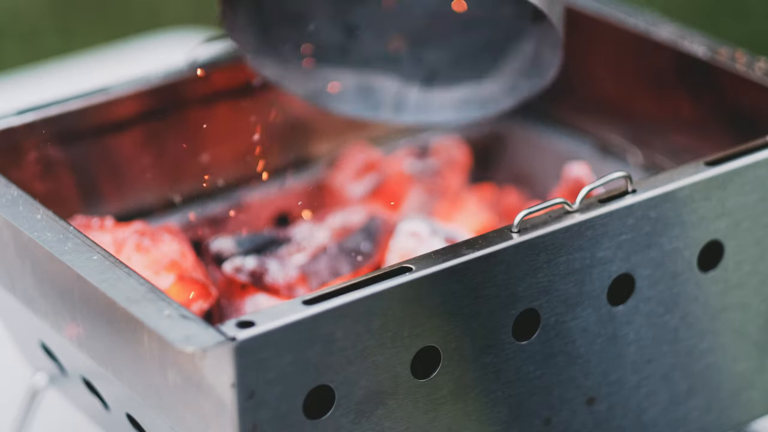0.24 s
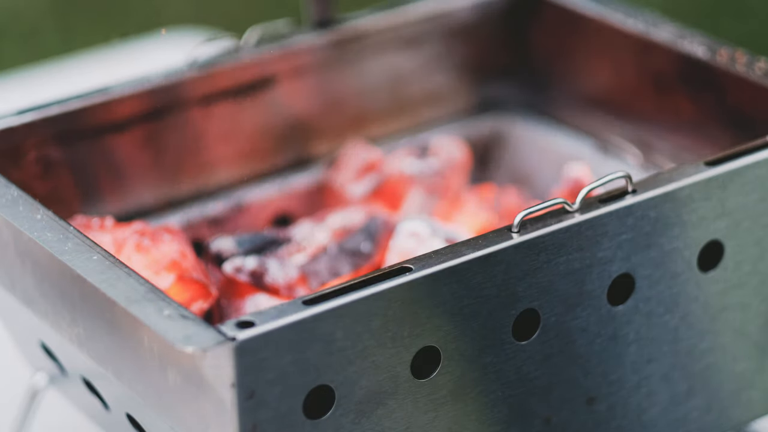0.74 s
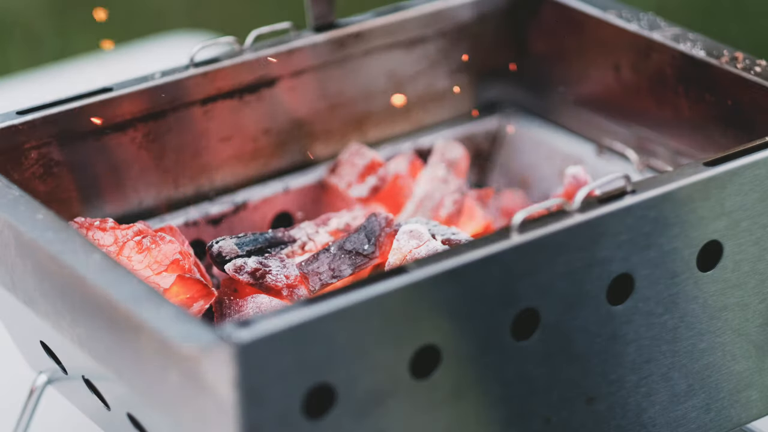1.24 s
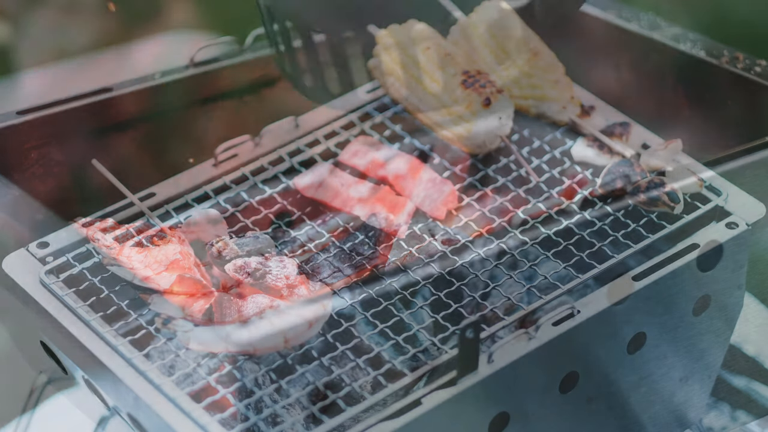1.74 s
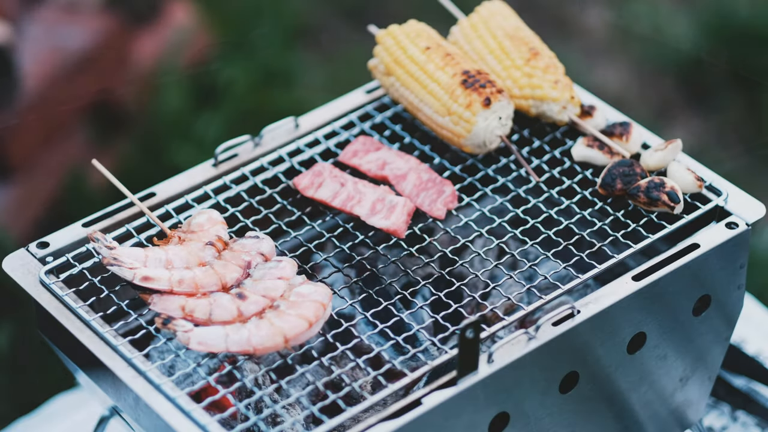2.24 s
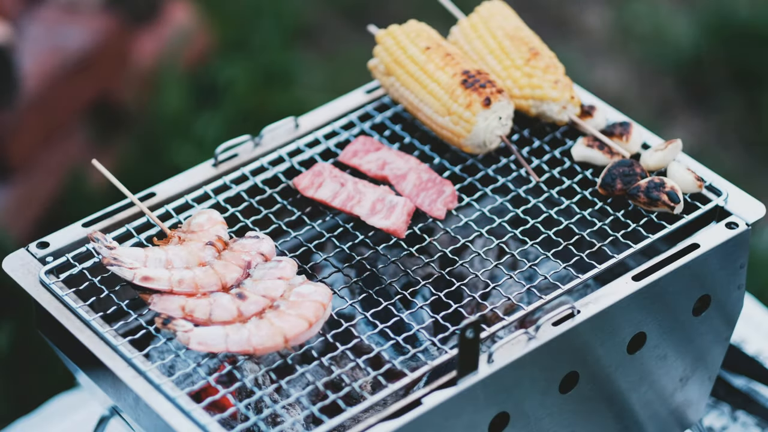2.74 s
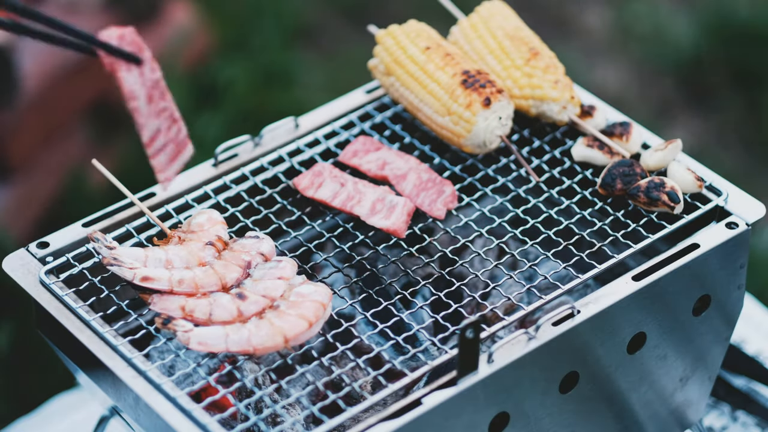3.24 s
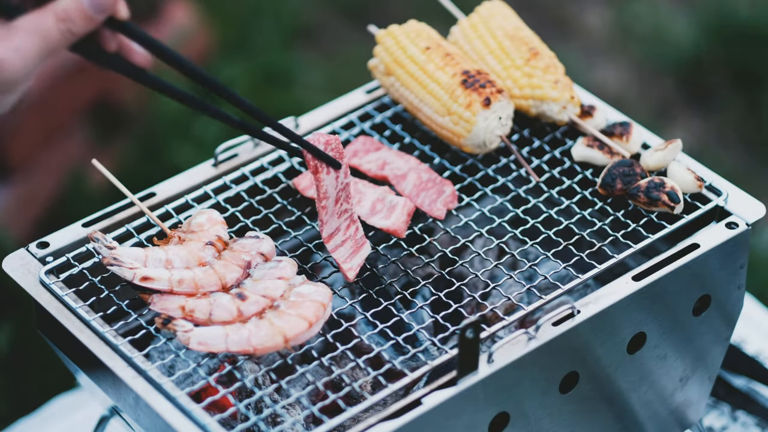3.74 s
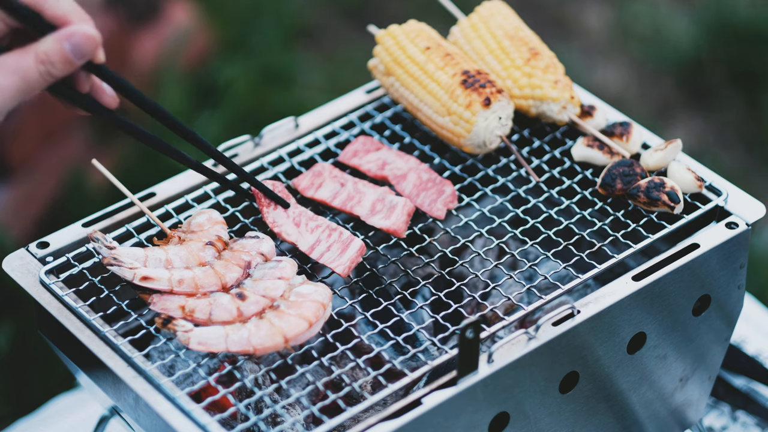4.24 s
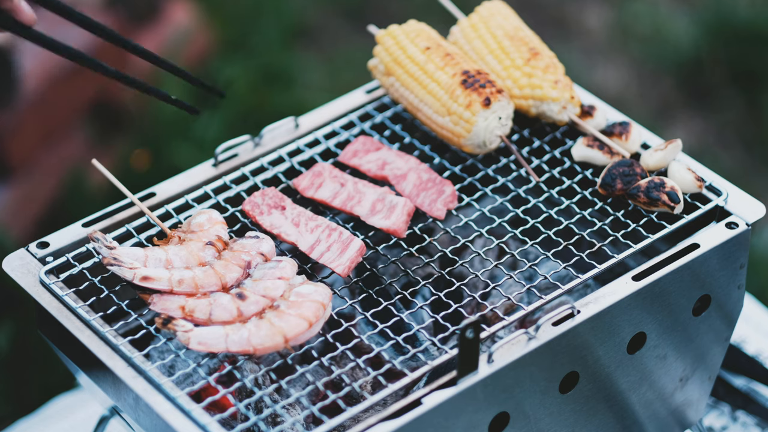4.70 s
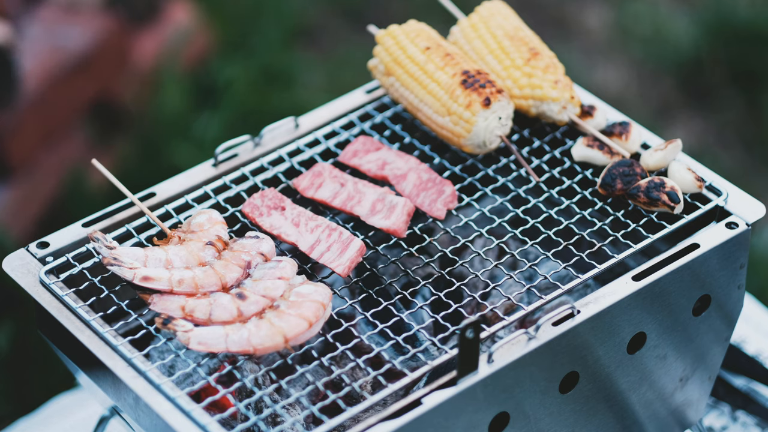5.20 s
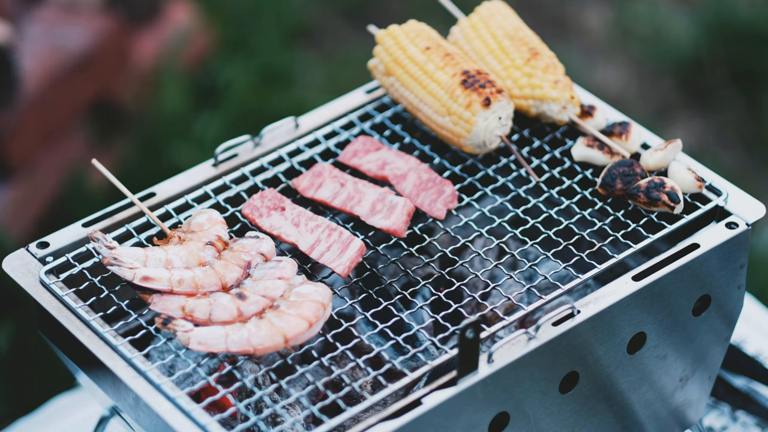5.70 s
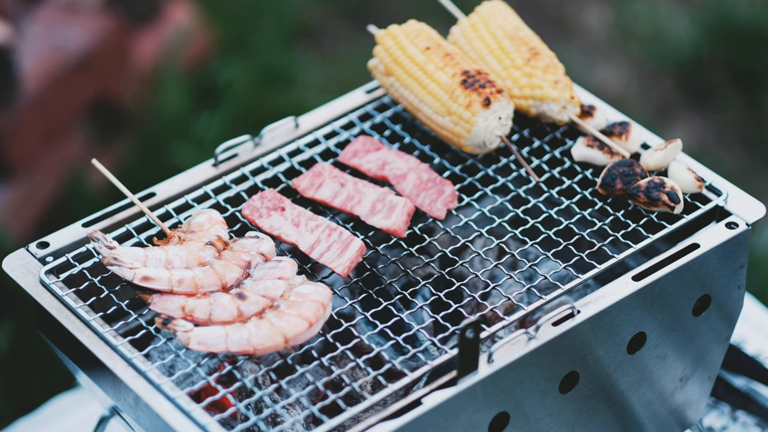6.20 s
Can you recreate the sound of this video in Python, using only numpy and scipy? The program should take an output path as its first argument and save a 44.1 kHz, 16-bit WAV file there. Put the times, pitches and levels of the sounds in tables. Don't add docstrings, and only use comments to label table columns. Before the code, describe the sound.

Close to the microphone in a quiet garden, hot coals tumble from a steel chimney into a metal grill with a bright rattle and gritty scrape. A heavy lump lands with a knock, then the rattle thins. Sharp isolated cracks follow over a soft hiss and a low rumbling draught. Fat sizzles later, while sparrows and songbirds call near and far.

```python
import sys
import numpy as np
from scipy import signal
from scipy.fft import rfft, irfft
from scipy.io import wavfile
from scipy.ndimage import uniform_filter1d

SR = 44100
rng = np.random.default_rng(int(sys.argv[2]) if len(sys.argv) > 2 else 0)


def bounce(signal):
    frames = np.transpose(np.atleast_2d(signal))
    limited = np.clip(frames, -1, 1)
    pcm = np.round(limited * 32767).astype(np.int16)
    wavfile.write(sys.argv[1], SR, pcm)


def natural_amplitude(level_db):
    exponent = np.asarray(level_db, float) / 20
    return 10 ** exponent


N = 284886
TOP_HZ = 15700


def level(x, db):
    return x * natural_amplitude(db) / np.sqrt(np.mean(x ** 2) + 1e-30)


def curve(table):
    s, *columns = np.transpose(table)
    return [np.interp(np.arange(N) / SR, s, c) for c in columns]


def band(x, lo_hz, hi_hz, order=2):
    edges = [lo_hz, min(hi_hz, .45 * SR)]
    return signal.sosfilt(signal.butter(order, edges, "band", fs=SR, output="sos"), x)


def colour(x, spectrum):
    hz, db = np.transpose(spectrum)
    f = np.fft.rfftfreq(len(x), 1 / SR) + 1
    gain = natural_amplitude(np.interp(np.log(f), np.log(hz), db))
    return irfft(rfft(x) * gain, len(x))


def add(out, s, x):
    i = max(int(s * SR), 0)
    out[i:i + len(x)] += x[:N - i]


def rings(modes, size):
    t = np.arange(size) / SR
    phase = 2 * np.pi * rng.random(len(modes))
    return sum(natural_amplitude(db) * np.sin(2 * np.pi * hz * t + p) * np.exp(-np.log(1000) * t / t60)
               for (hz, db, t60), p in zip(modes, phase))


def walk(rate):
    k = int(SR / rate)
    held = np.repeat(rng.standard_normal(N // k + 1), k)
    return 1.29 * uniform_filter1d(uniform_filter1d(held, k), k)[:N]


def clicks(rate, spread_db):
    chance = rng.random((3, N))
    struck = chance[0] < rate / SR
    return struck * np.sign(chance[1] - .5) * natural_amplitude(-spread_db * np.log(chance[2] + 1e-4))


def tone(out_len, table, wobble=0):
    s, hz, db = np.transpose(table)
    t = s[0] + np.arange(out_len) / SR
    ends = np.clip(np.minimum(t - s[0], s[-1] - t) / 0.00089, 0, 1)
    turns = np.cumsum(np.interp(t, s, hz) + wobble) / SR
    return np.sqrt(2) * ends * natural_amplitude(np.interp(t, s, db)) * np.sin(2 * np.pi * turns)


def sung(notes, shape):
    return [[(s + ds, hz * r, db + g) for ds, r, g in shape] for s, hz, db in notes]


def echoes(x, fade, db):
    t = np.arange(SR // 3) / SR
    scatter = level(rng.standard_normal(len(t)) * np.exp(-t / fade), db) / np.sqrt(len(t))
    return x + signal.fftconvolve(x, scatter)[:N]


def rattle():
    # t/s, peak level/dB, grit level/dB, fade/s
    clangs = [(0.019, -14.5, -12, 0.032), (0.0514, -24, 4, 0.01), (0.0772, -23.5, -20, 0.024),
              (0.0951, -25.5, -19, 0.044), (0.159, -24, -3, 0.013), (0.2042, -31.5, -12, 0.036),
              (0.2808, -34.5, -9, 0.022), (0.39, -30, -11, 0.031), (0.48, -41, 0, 0.014),
              (0.5813, -23.5, -2, 0.031), (0.6683, -34.5, -11, 0.045), (0.6994, -36, -4, 0.044),
              (0.7275, -26.5, -13, 0.049), (0.7818, -27.5, -17, 0.018), (0.805, -30.5, -16, 0.021),
              (1.078, -14.5, -11, 0.014), (1.0828, -34, -23, 0.01), (1.1857, -35.5, 19, 0.011),
              (1.3706, -33, -7, 0.073), (1.4344, -27, -30, 0.03), (1.6127, -39.5, -8, 0.14),
              (1.6751, -26.5, -3, 0.0077), (1.8007, -32, -27, 0.073), (2.9894, -42, 1, 0.025),
              (3.1353, -39.5, -7, 0.024), (1.078, -25, 17, 0.043), (3.15, -29, 24, 0.032)]
    # f/Hz, level/dB, t60/s
    steel_modes = [(1118, -7.5, 0.099), (1400, -1.5, 0.072), (1722, -3.5, 0.067), (2038, -10.5, 0.14),
                   (2450, -6, 0.09), (2950, 1.5, 0.019), (3260, -3, 0.043), (3700, 0, 0.047),
                   (4200, -6, 0.052), (4700, -2, 0.054), (5480, -8, 0.04), (8080, 0, 0.026)]
    out, t = np.zeros(N), np.arange(8192) / SR
    for (s, db, grit_db, fade), n in zip(clangs, rng.standard_normal((len(clangs), 3, 8192))):
        chatter = n[0] * natural_amplitude(7.3 * n[1]) * np.exp(-t / fade)
        steel = level(signal.fftconvolve(chatter, rings(steel_modes, size=4096))[:8192], -5.0)
        scrape = level(band(chatter, 710, 6000), -4.0)
        grit = level(band(n[2] * np.exp(-t / (0.51 * fade)), 6000, 9300, order=1), grit_db)
        clang = steel + scrape + grit
        add(out, s + 0.000988, clang * natural_amplitude(db) / np.abs(clang).max())
    return out


def pops():
    # t/s, peak level/dB, ring f/Hz, bass level/dB, treble level/dB
    lumps = [(0.2157, -14, 7960, -24.5, -2), (0.3499, -15.5, 4900, -25, -5), (0.389, -13, 8250, -29.5, -21),
             (0.9066, -1.5, 7900, -33, 4.5), (1.064, -25, 1460, -28, -24), (1.8538, -18, 3850, 21, -28),
             (2.3296, -6.5, 3700, -24, -11), (2.388, -13.5, 2750, -13.5, 0.5),
             (2.7442, -2, 2450, -37, -4.5), (2.8451, -13.5, 2360, -6, -45),
             (2.9756, 1.5, 12900, -30.5, -11), (3.1067, -14.5, 1400, -14, -36),
             (3.4707, 4.5, 7460, -22.5, -10), (3.925, -10, 2630, -30, -8), (3.932, -6, 4700, -30, -6),
             (4.2364, -1.5, 3700, -24, -0.5), (4.599, 3, 4500, -30, -4.5), (4.758, -9.5, 4800, -30, -12),
             (4.8036, -15.5, 4700, -25, -1), (4.8849, -16.5, 2700, -6, -40), (5.014, -12.5, 4360, -21, 3),
             (5.2134, -16, 4600, -13, -18), (5.4817, -12, 3700, -18.5, -2.5),
             (5.6015, 3, 3130, -27.5, -4.5)]
    # burst/ms, body level/dB, dull above f/Hz
    forms = [(.5, -4, 15000), (.5, 4, 15000), (.5, 2.5, 15100), (.5, -4, 15000), (.5, 0, 12000),
             (.5, 0, 7950), (.5, 5, 13100), (.5, 0, 13000), (.5, 2, 13000), (.5, 8, 3640),
             (.5, -0.5, 15700), (.5, -21, 5600), (.3, -2.5, 9200), (.5, -4, 12940), (.5, 5, 13000),
             (.5, -22, 13000), (.4, -7, 15000), (.5, 5.5, 15000), (.5, -13, 8030), (.5, 2, 8000),
             (.5, 6, 15000), (.5, -6, 8000), (.5, 2, 8960), (.55, -3.5, 12000)]
    # t/s, peak level/dB, ring f/Hz
    sparks = [(0.144, -38, 1400), (0.16, -32, 3100), (0.207, -28, 3800), (0.241, -22.5, 1450),
              (0.283, -31, 3070), (0.322, -30, 4690), (0.3681, -23, 4400), (0.629, -20.5, 5960),
              (0.7276, -36, 4340), (1.002, -35, 4420), (1.04, -24, 5500), (1.143, -27, 3700),
              (1.284, -29.5, 5470), (1.306, -29, 1890), (1.37, -33, 5550), (1.511, -32, 3750),
              (1.621, -35, 4400), (1.6744, -26.5, 2050), (1.7999, -29.5, 4070)]
    # t/s, peak level/dB, ring f/Hz
    ticks = [(2.036, -36, 5480), (2.0785, -34, 1630), (2.1166, -36, 8060), (2.272, -34, 8160),
             (2.5548, -30.5, 1570), (2.6276, -35.5, 1720), (2.7294, -29, 2860), (3.013, -24.5, 4800),
             (3.187, -27, 4180), (3.242, -26.5, 3280), (4.5128, -27, 4600), (5.058, -27, 5340),
             (5.4982, -24, 3160), (5.819, -27.5, 1970), (5.905, -33, 7100), (6.119, -31, 4500),
             (6.332, -29, 6600), (6.427, -31, 8300)]
    cracks = [(*row, *form) for row, form in zip(lumps, forms)]
    cracks += [(*row, -25.5, -2.5, 0.22, 0, TOP_HZ) for row in sparks]
    cracks += [(*row, -25.5, -5, 0.51, 0, TOP_HZ) for row in ticks]
    cracks = sorted(cracks)
    out, t = np.zeros(N), np.arange(1024) / SR
    noises = rng.standard_normal((len(cracks), 1024))
    for (s, db, hz, bass_db, treble_db, ms, body_db, dull_hz), n in zip(cracks, noises):
        burst = n * (np.exp(-t * 1e3 / max(ms, .1)) + natural_amplitude(-15.5) * np.exp(-t / 0.0033))
        burst[:2] = -1.35
        body = level(band(burst, 1190, 2830), body_db - 9.5) + level(band(burst, 2170, 6500, order=3), -2)
        ring = level(band(burst, hz / 1.266, hz * 1.125, order=1), 0)
        bass = level(band(burst, 196, 2850, order=1), bass_db + 21.0)
        treble = level(band(burst, 4900, 10520, order=3), treble_db + 8.0)
        pop = band(body + ring + bass + treble, 40, dull_hz)
        add(out, s + 0.001072, pop * natural_amplitude(db) / np.abs(pop).max())
    return out


def spits():
    # t/s, peak level/dB, centre f/Hz
    snaps = [(2.3882, -29, 13200), (2.7441, -1.5, 11600), (2.9758, -8, 13200), (3.1070, -27.5, 13000),
             (3.9246, -28, 12900), (3.9322, -18, 12600), (4.238, -5, 11800), (4.5987, -11, 14200),
             (4.7576, -16, 13000), (5.014, -21, 12900), (5.483, -27, 12900), (0.907, -12, 13100),
             (2.329, -11, 6550), (2.329, -22, 14500), (2.7445, -16, 4940), (4.5985, -7, 5400),
             (5.6018, -8, 2210), (3.471, -4, 7950)]
    # t/s, peak level/dB, centre f/Hz
    grains = [(.004, -32, 1290), (0.0204, -23, 2950), (.0215, -25, 11000), (.035, -26, 6550),
              (0.051, -20, 10700), (.0642, -28, 11000), (.0712, -25, 10500), (.0885, -29, 8500),
              (.105, -32, 11000), (0.1597, -30, 9000), (.2185, -25, 9000), (0.225, -37, 2500),
              (.616, -33, 9000), (.634, -35, 9000), (.674, -37, 8500), (.7015, -38, 8500),
              (0.728, -21, 8250)]
    # t/s, peak level/dB, centre f/Hz
    fat_spits = [(3.6885, -41, 9500), (3.723, -36, 9500), (3.7284, -45, 9500), (3.7767, -36, 9500),
                 (3.8024, -39, 9500), (3.8157, -31, 9500), (3.895, -39, 9500), (3.9804, -46, 9500),
                 (4.042, -33, 9500), (4.0764, -33, 9500), (4.197, -29, 9400), (4.9412, -34, 9500),
                 (5.5548, -38, 9500), (5.659, -31, 9500), (5.8636, -45, 9500), (5.9284, -35, 9500),
                 (6.0546, -33, 9500), (6.2696, -45, 9500), (6.3735, -30, 9500)]
    # t/s, peak level/dB, centre f/Hz
    chips = [
        (1.0632, -26, 8700),
        (0.96, -16, 11000),
        (1.111, -23, 7100),
        (1, -26, 5900),
        (2.989, -25, 8800),
        (4.3, -43, 1400),
        (2.5, -46, 1600),
        (2.884, -29.5, 8300),
        (.305, -36, 12000),
        (0.39, -31, 15000),
    ]
    rows = snaps + grains + fat_spits + chips
    fade_ms, span = 0.69, 1.21
    out, t = np.zeros(N), np.arange(256) / SR
    for (s, db, hz), n in zip(rows, rng.standard_normal((len(rows), 256))):
        spit = band(n * np.exp(-t * 1e3 / fade_ms), hz / span, hz * span)
        add(out, s + .001, spit * natural_amplitude(db) / np.abs(spit).max())
    return out


def pings():
    # t/s, level/dB, f/Hz, length/s
    panels = [(0.019, -29.5, 3370, .016), (0.039, -36.5, 1950, 0.016), (0.078, -35, 3130, 0.05),
              (0.089, -37.5, 8200, 0.016), (0.141, -40.5, 1150, 0.012), (0.159, -34.5, 1120, 0.0051),
              (.163, -51, 7800, .015), (0.598, -53, 1430, 0.028), (0.671, -46.5, 1610, 0.034),
              (0.73, -38, 8100, 0.017), (0.781, -50, 8100, .012), (0.788, -48, 1680, 0.039),
              (0.803, -51, 8200, 0.012), (1.081, -24.5, 1750, 0.011), (1.083, -39, 8600, 0.026)]
    span = 1.07
    out, t = np.zeros(N), np.arange(4096) / SR
    for (s, db, hz, length), n in zip(panels, rng.standard_normal((len(panels), 4096))):
        ring = level(band(n, hz / span, hz * span, order=1), db)
        rise = np.minimum(t / 0.00055, 1)
        add(out, s, ring * rise * np.exp(-np.maximum(t - 0.53 * length, 0) / (0.51 * length)))
    return out


def knocks():
    # t/s, peak level/dB, ring f/Hz, ring t60/s
    blows = [(0.6415, -33.5, 222, 0.029), (1.0783, -6, 1230, 0.02), (1.118, -30, 1300, 0.013),
             (1.156, -37.5, 544, 0.14), (1.183, -19.5, 990, 0.018), (1.296, -34, 1007, 0.024),
             (1.337, -28, 855, 0.047), (1.389, -33, 720, 0.026), (1.435, -29.5, 1050, 0.019),
             (1.449, -25.5, 1450, 0.009), (2.518, -35.5, 242, 0.013), (3.612, -37, 255.5, 0.042),
             (4.929, -31, 1180, 0.043), (5.256, -37.5, 710, 0.023), (1.0695, -21.5, 713, 0.03)]
    # pitch ratio, level/dB
    board = [(0.991, 8), (0.472, -6.5), (1.203, 3), (.38, -17), (1.6, -1), (2.2, -5), (0.686, -7),
             (9.8, -38)]
    out, t = np.zeros(N), np.arange(4096) / SR
    for (s, db, hz, t60), n in zip(blows, rng.standard_normal((len(blows), 4096))):
        wood = rings([(hz * r, g, t60 / r) for r, g in board], size=4096) * (1 - np.exp(-t / 0.0002))
        buzz = band(n, hz * 0.71, hz * 1.63, order=1) * np.exp(-t / (1.54 * t60)) * natural_amplitude(-3.5)
        add(out, s + .0006, (wood + buzz) * natural_amplitude(db) / np.abs(wood + buzz).max())
    return out


def thuds():
    # t/s, peak level/dB, f/Hz
    jolts = [(1.855, -38, 120), (2.454, -35.5, 149), (2.845, -34, 201), (2.976, -35, 200), (3.33, -45, 120),
             (3.471, -32, 90), (3.471, -25, 516), (4.6, -32, 304), (4.762, -31.5, 152), (4.886, -40, 300),
             (5.602, -35, 255)]
    out, t = np.zeros(N), np.arange(4096) / SR
    for s, db, hz in jolts:
        swing = -np.sin(2 * np.pi * hz * t) * np.exp(-t * hz / 0.58)
        add(out, s + 0.0018, natural_amplitude(db) * swing)
    return out


def rustle():
    # t/s, level/dB, centre f/Hz, fade/s
    slides = [
        (4.505, -47, 900, 0.046),
        (4.715, -45.5, 700, 0.012),
        (4.886, -34.5, 900, 0.017),
        (4.925, -47, 700, .02),
    ]
    out, t = np.zeros(N), np.arange(8192) / SR
    for (s, db, hz, fade), n in zip(slides, rng.standard_normal((len(slides), 2, 8192))):
        grains = band(n[0] * natural_amplitude(4.3 * n[1]), hz / 2.7, hz * 1.9, order=1)
        add(out, s, level(grains, db) * np.exp(-t / fade))
    return out


def sizzle():
    # t/s, level/dB
    hiss = [(0, -54), (0.2, -65), (0.77, -70), (1.04, -53.5), (1.26, -70), (2.03, -60), (3.45, -57.5),
            (3.76, -57), (4.19, -47), (4.39, -44), (5.25, -50.5), (5.67, -53), (6.46, -51.5)]
    # f/Hz, level/dB per Hz
    hiss_colour = [(1500, -31), (2500, -7), (4000, -5), (6000, -4), (7200, -2.5), (8100, 2.5), (9300, -3.5),
                   (10500, -0.5), (12000, -8), (13500, -6.5), (15500, -8.5)]
    fizz = level(clicks(900, 3), -9) + rng.standard_normal(N)
    return level(colour(fizz, hiss_colour), 2.06) * natural_amplitude(curve(hiss)[0] + walk(7.3))


def fat():
    # t/s, level/dB
    drip = [
        (0, -80),
        (3.55, -69),
        (3.8, -59),
        (4.4, -61),
        (5.3, -63),
        (6.1, -67),
        (6.46, -65),
    ]
    # f/Hz, level/dB per Hz
    drip_colour = [(9000, -28), (10800, -9), (12100, 3), (13200, -7), (14800, 0), (16000, -13)]
    fizz = level(clicks(600, 3), -8) + rng.standard_normal(N)
    return level(colour(fizz, drip_colour), 0) * natural_amplitude(curve(drip)[0] + 1.5 * walk(12))


def roar():
    # t/s, level/dB
    glow = [
        (0, -51),
        (.2, -55),
        (.8, -55.5),
        (1.04, -52),
        (1.46, -58.5),
        (4.19, -56.5),
        (4.39, -55.5),
        (5.3, -55.5),
        (5.7, -57),
        (6.46, -58),
    ]
    # f/Hz, level/dB per Hz
    roar_colour = [(150, -5.5), (300, -3.5), (600, -2), (1200, -3.5), (2000, -9), (3500, -12.5),
                   (6000, -7.5), (16000, -43)]
    return level(colour(rng.standard_normal(N), roar_colour), 0.2) * natural_amplitude(curve(glow)[0] + 2.0 * walk(5.195))


def chimney_hum():
    # t/s, f/Hz, level/dB
    swell = [
        (0.853, 152, -69),
        (0.878, 157, -65),
        (0.991, 155, -43),
        (1.042, 143, -52),
        (1.066, 138, -77),
    ]
    out = np.zeros(N)
    add(out, swell[0][0], tone(SR, swell))
    return out


def sparrows():
    # t/s from start, pitch ratio, level/dB
    zigzag = [(0, .8, -4), (0.016, 1, 1.5), (0.029, 0.96, 2), (.045, .76, -9), (.068, .7, -5.5),
              (0.094, .88, 1), (.112, .73, -17), (0.134, 0.71, -8), (0.15, 0.99, -14)]
    slide = [(0, .86, -2), (0.013, 1, 1), (0.034, .81, 0), (.06, .78, -0.5), (.09, 0.6, -11.5)]
    chirp_shape = [(0, .74, -12), (.009, .88, -1), (.026, 1, 2), (.036, .78, -1), (.048, .7, -4),
                   (.062, .78, -14), (.08, .71, -2), (.095, .62, -7)]
    hook = [(0, .86, -5), (.014, 1, 0), (.028, .88, -1), (.04, .74, -3)]
    # t/s, f/Hz, level/dB
    near_zigzags = [
        (.912, 4780, -34.5),
        (1.762, 4740, -41),
    ]
    near_slides = [
        (.725, 4780, -39),
        (1.41, 4540, -44),
    ]
    # t/s, f/Hz, level/dB
    far_chirps = [(2.83, 4850, -49), (3.553, 4800, -46.5), (5.362, 4800, -46.5), (6.107, 4750, -47.5)]
    far_hooks = [(2.789, 4400, -49), (2.895, 4000, -51), (5.435, 4300, -51), (5.485, 4000, -50),
                 (5.53, 4000, -52),
                 (5.775, 4750, -52), (5.835, 4700, -54)]
    far_zigzags = [(5.66, 4950, -48.5)]
    # delay t/s, level/dB
    fence_returns = [
        (.033, -4),
        (.062, -9),
        (.092, -11),
    ]
    spread_s = .0012
    out, near = np.zeros(N), np.zeros(N)
    flutter = walk(400), walk(400)
    far_lines = sung(far_chirps, chirp_shape) + sung(far_hooks, hook) + sung(far_zigzags, zigzag)
    for line in far_lines:
        hoarse = 120 * flutter[1][int(line[0][0] * SR):][:SR // 4]
        add(out, line[0][0], tone(SR // 4, line, hoarse))
    out = out * natural_amplitude(4 * flutter[0] - 2)
    t = np.arange(SR // 8) / SR
    blur = rng.standard_normal(len(t)) / np.sqrt(spread_s * SR)
    fences = sum(natural_amplitude(db) * np.exp(-np.abs(t - s) / spread_s) for s, db in fence_returns) * blur
    out = out + signal.fftconvolve(out, fences)[:N]
    for line in sung(near_zigzags, zigzag) + sung(near_slides, slide):
        hoarse = 110 * flutter[0][int(line[0][0] * SR):][:SR // 4]
        add(near, line[0][0], tone(SR // 4, line, hoarse))
    return echoes(out, .065, -3) + echoes(near * natural_amplitude(4 * flutter[1] - 2.5), .05, -3)


def songbirds():
    # t/s from start, pitch ratio, level/dB
    dive = [(0, .98, -12), (.006, 1, -3), (.016, .93, 0), (.025, .78, -4), (.033, .62, -14)]
    phrase = [(0, .86, -4), (.007, 0.95, 0.5), (0.034, 0.98, 8.5), (.039, 0.73, 3.5), (.052, .72, -2),
              (0.077, .6, -3.5)]
    arch = [(0, .8, -2), (0.013, 1, 6), (0.023, .9, 1)]
    step = [(0, 1.02, -6), (0.03, .85, -12), (.05, .99, -4), (0.114, 1, 1), (.135, .83, -6),
            (0.211, .74, -9)]
    # t/s, f/Hz, level/dB
    dives = [(.62, 6020, -43), (.767, 6600, -44), (1.27, 6140, -41.5), (1.401, 6430, -41.5)]
    phrases = [(4.882, 5420, -45), (4.982, 5340, -44.5), (5.115, 5350, -45.5), (5.215, 5370, -44.5)]
    arches = [(.34, 5540, -46), (.645, 3180, -54.5), (1.37, 5730, -48.5), (1.49, 5870, -55),
              (2.005, 6640, -55.5)]
    steps = [
        (3.695, 2890, -53),
        (5.09, 2950, -51.5),
    ]
    # t/s, length/s, from f/Hz, to f/Hz, level/dB
    glides = [(2.052, 0.033, 5950, 5600, -52), (2.09, .02, 5650, 6850, -54), (2.13, 0.041, 4400, 5100, -58),
              (3.327, 0.0071, 4200, 6000, -46), (3.331, 0.025, 5720, 6200, -36.5),
              (3.328, 0.032, 6400, 6770, -45), (3.888, 0.056, 3820, 3660, -58),
              (3.986, 0.05, 3570, 3640, -65), (4.046, .1, 3626, 3540, -51.5),
              (4.167, 0.175, 3540, 3630, -48), (4.349, 0.036, 3500, 3570, -49),
              (4.394, 0.021, 3570, 3570, -45), (0.708, 0.017, 4200, 4240, -49),
              (0.705, 0.022, 4970, 5700, -44), (4.865, 0.0087, 4800, 6000, -39),
              (4.96, 0.0103, 6160, 3920, -40.5), (5.098, 0.011, 4830, 5730, -42),
              (5.195, 0.0097, 6300, 3700, -42), (5.293, 0.056, 3230, 2380, -54.5)]
    # t/s, centre f/Hz, level/dB
    trill = [
        (4.49, 4700, -67.5),
        (4.568, 4460, -59),
        (4.704, 4790, -61.5),
        (4.759, 4720, -59.5),
        (4.83, 4700, -70),
    ]
    ends_db, crest = -6.5, 0.61
    out = np.zeros(N)
    quaver = 22 * walk(300)
    lines = sung(dives, dive) + sung(phrases, phrase) + sung(arches, arch) + sung(steps, step)
    for s, length, a, b, db in glides:
        peak = (s + crest * length, a + crest * (b - a), db)
        lines.append([(s, a, db + ends_db), peak, (s + length, b, db + ends_db)])
    for line in lines:
        add(out, line[0][0], tone(SR, line, quaver[int(line[0][0] * SR):][:SR]))
    saw = (np.cumsum(205 * (1 + .15 * walk(100))) / SR % 1)[:SR]
    sweep = 1500 * (.5 - saw) + 150 * walk(300)[:SR]
    add(out, trill[0][0], tone(SR, trill, sweep) * np.sin(np.pi * saw) ** .5 * natural_amplitude(19.0))
    return echoes(out, .035, -6)


def draught():
    # f/Hz, level/dB per Hz
    rumble_colour = [(12, -36), (20, -1.5), (43, -5.5), (123, -3.5), (210, -8), (300, -17), (425, -36.5),
                     (500, -36), (650, -44), (1100, -120)]
    early_db, late_db, swell_mid_s, settle_s = -65.5, -54, 1.97, 0.7
    swollen = .5 + .5 * np.tanh((np.arange(N) / SR - swell_mid_s) / settle_s)
    draught_db = early_db + (late_db - early_db) * swollen
    rumble = level(colour(rng.standard_normal(N), rumble_colour), .1)
    return rumble * natural_amplitude(draught_db + walk(14) + 2 * walk(30))


def garden(x):
    # delay t/s, level/dB
    wall = [
        (0.026, -29),
        (0.055, -45),
    ]
    t = np.arange(SR // 4) / SR
    slaps = sum(natural_amplitude(db) * (t > s) * np.exp(-np.abs(t - s) / 0.0017) for s, db in wall)
    tail = natural_amplitude(-39.5) * (t > .02) * np.exp(-t / 0.083)
    scatter = rng.standard_normal(len(t)) * (slaps + tail) * 0.12
    return x + band(signal.fftconvolve(x, scatter)[:N], 270, 14000, order=1)


def scene():
    cracks, grit = pops(), spits()
    glow = sizzle() + roar() + draught()
    mono = garden(cracks + knocks()) + rattle() + glow + songbirds() + sparrows() + chimney_hum()
    mono = mono + garden(grit) + pings() + fat() + thuds() + rustle()
    side = natural_amplitude(-39) * band(np.roll(glow, SR), 20, 900)
    side = side + natural_amplitude(-31) * band(np.roll(cracks + grit, 5), 3500, 15000)
    side = side + natural_amplitude(-36) * band(np.roll(cracks, 40), 200, 600)
    return np.array([mono + side, mono - side])


def band_limit(x):
    return signal.sosfilt(signal.butter(12, 16500, fs=SR, output="sos"), x)


def record(dry):
    # f/Hz, sharpness, depth 0-1
    mic_dips = [
        (6010, 3.25, 0.43),
        (10000, 3.1, 0.57),
    ]
    x = signal.sosfilt(signal.ellip(8, .2, 60, TOP_HZ, fs=SR, output="sos"), dry)
    for hz, sharp, depth in mic_dips:
        notched = signal.lfilter(*signal.iirnotch(hz, sharp, SR), x)
        x = x + min(depth, 1) * (notched - x)
    return band_limit(np.clip(x, -1, 1))


dry = scene()
out = record(dry)
bounce(out)
```